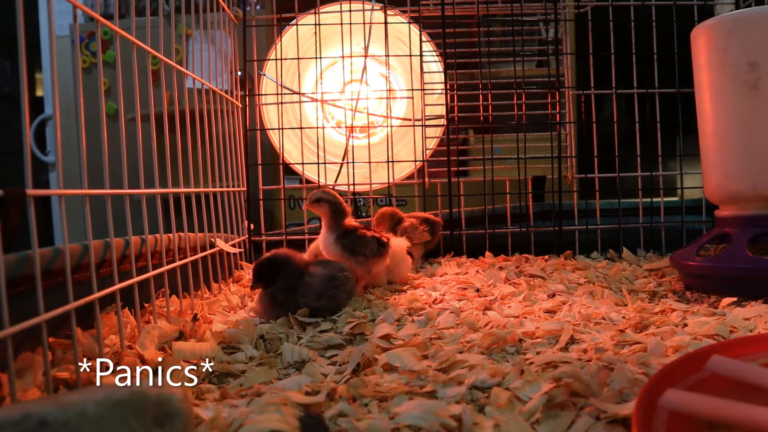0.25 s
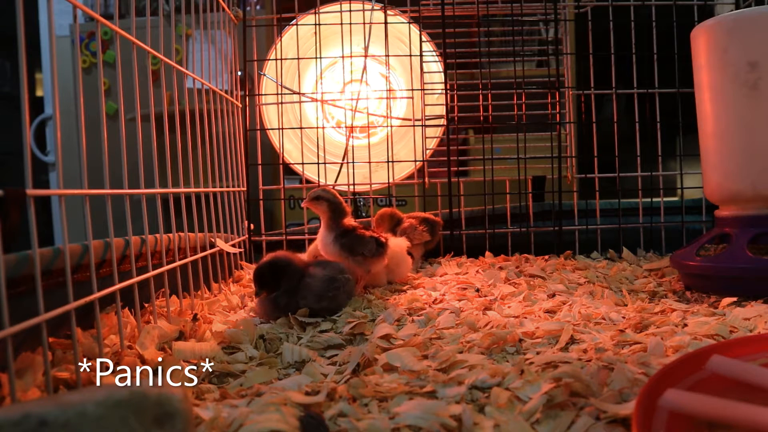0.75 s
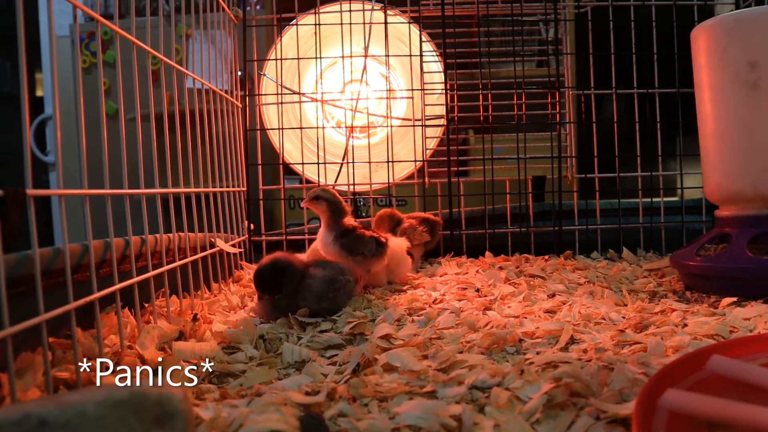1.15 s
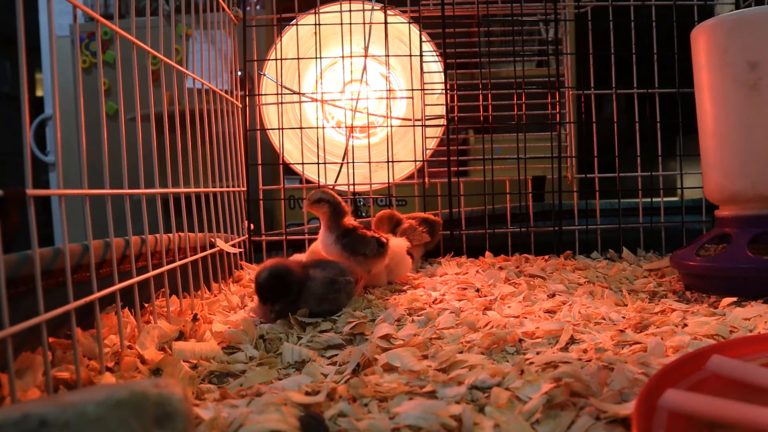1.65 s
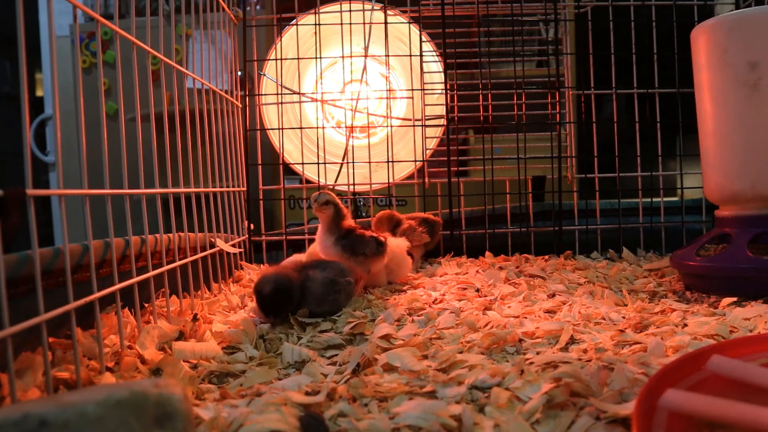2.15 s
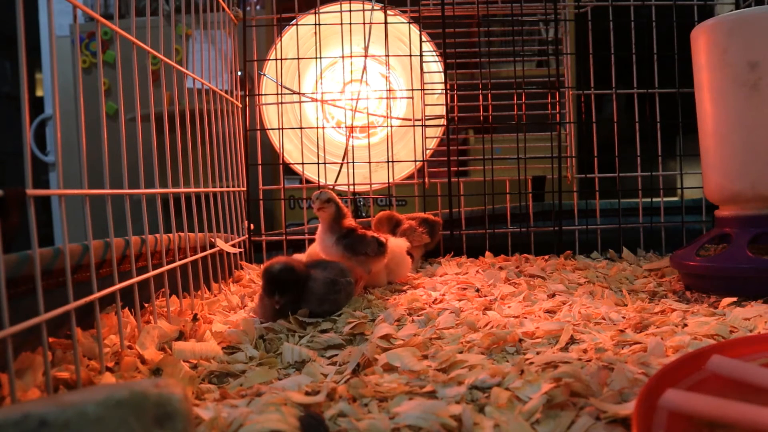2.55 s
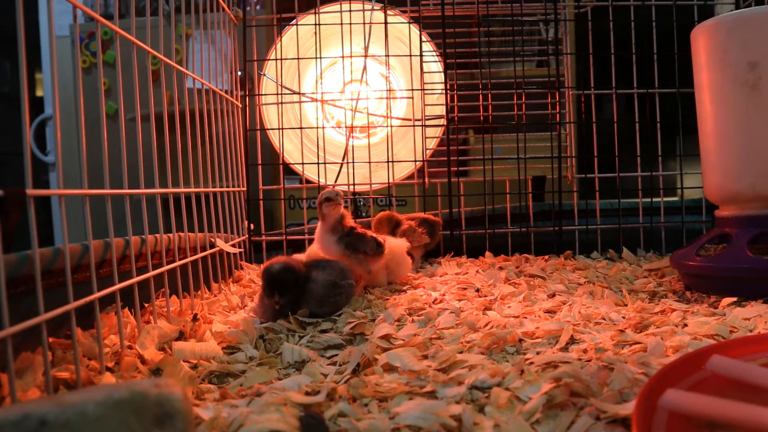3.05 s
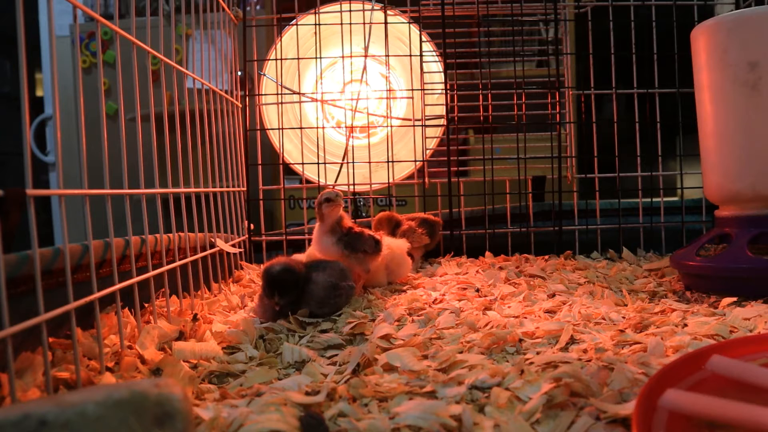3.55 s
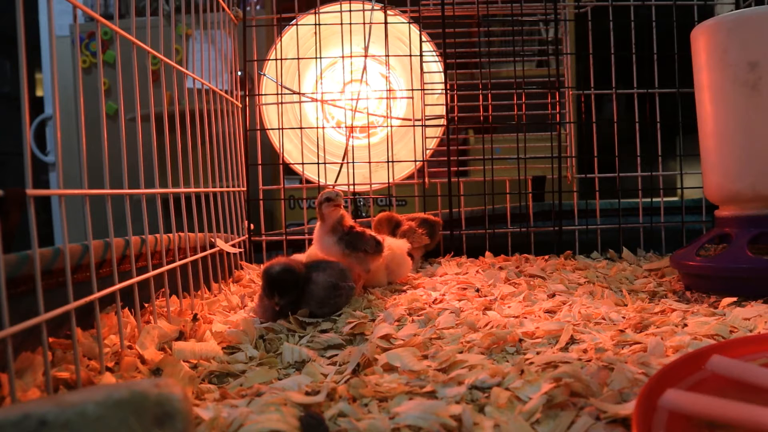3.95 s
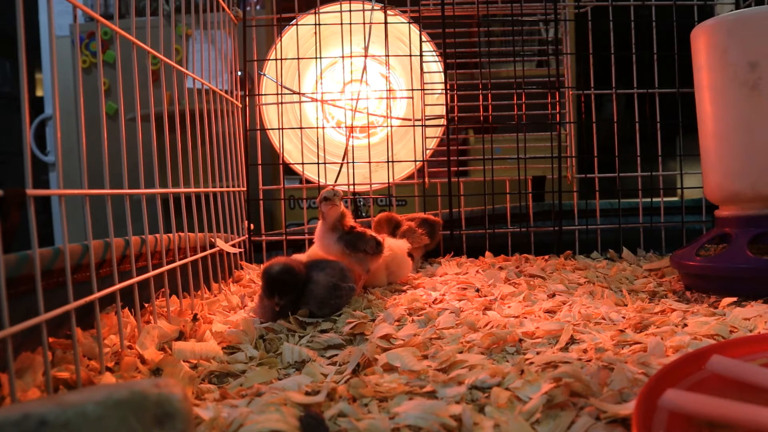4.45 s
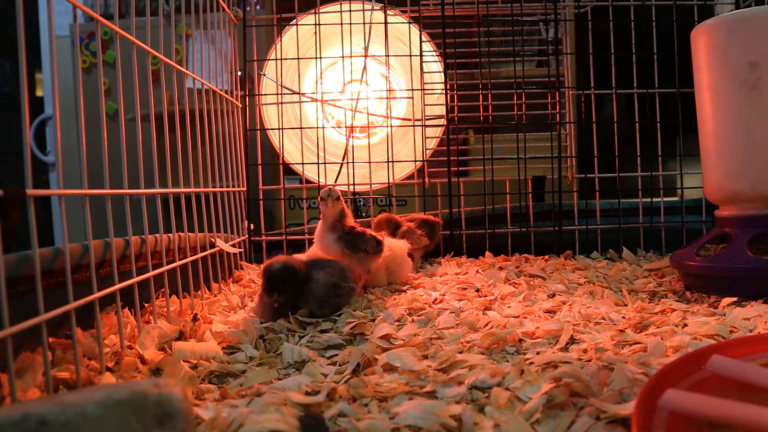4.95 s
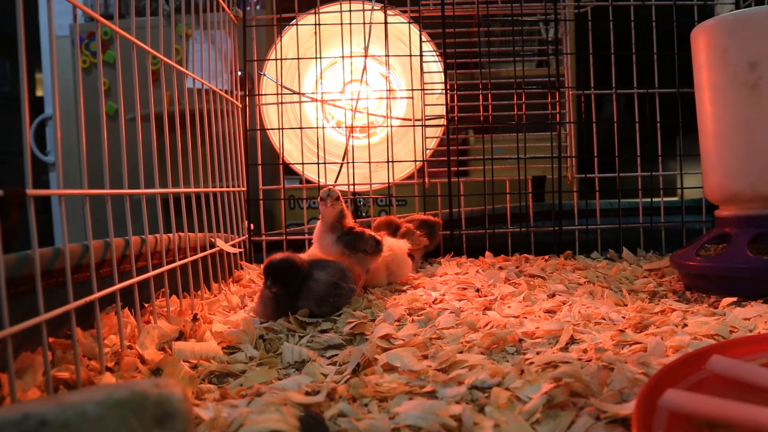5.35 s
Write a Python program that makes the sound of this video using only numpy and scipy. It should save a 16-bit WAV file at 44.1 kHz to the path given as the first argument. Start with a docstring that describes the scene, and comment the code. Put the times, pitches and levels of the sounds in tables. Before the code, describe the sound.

Faint low hum and moving air open the scene, then a chick starts calling: brief, piercing, falling peeps with a slightly raspy, fluttering onset and a clean whistled end. About fourteen calls follow, becoming more regular and forceful. Tiny dry ticks and two soft puffs are barely noticeable between them. Close stereo pickup in a small room, with short reflections off the cage and walls.

```python
"""Chick peeping in a brooder

A chick gives loud distress peeps in a wire brooder in a small room. Two beating syrinx voices slide down and
lock into one whistle, which plunges as the breath runs out; throat and beak colour it, and near surfaces
notch it as it falls. The chick turns its head to the microphones and calls with growing effort.
Behind it: hum of wavering sines, moving air and a hollow tone of shaped noise, ticks in the shavings,
soft puffs of noise."""
import sys
import numpy as np
from scipy import signal
from scipy.fft import rfft, irfft, next_fast_len
from scipy.io import wavfile
from scipy.ndimage import uniform_filter1d

SR = 44100
rng = np.random.default_rng(int(sys.argv[2]) if len(sys.argv) > 2 else 0)


def output_pcm(signal):
    """Save a mono or channel-first signal as 16-bit PCM at the path in sys.argv[1].

    Samples are clipped to [-1, 1] before scaling.
    """
    pcm = np.clip(np.atleast_2d(signal).T, -1, 1) * 32767
    wavfile.write(sys.argv[1], SR, np.round(pcm).astype(np.int16))


N = 246959
TIME = np.arange(N) / SR  # s


def from_db(db):
    """Decibels to amplitude gain."""
    return 10 ** (np.asarray(db) / 20)


def rms_one(x):
    """Scale to unit rms."""
    return x / np.sqrt(np.mean(x ** 2) + 1e-20)


def at_hz(points, hz):
    """Read a spectrum on a log-frequency axis."""
    freqs, values = np.transpose(points)
    return np.interp(np.log(np.maximum(hz, 1)), np.log(freqs), values)


def colour(x, gain_at):
    """Filter by a gain that is a function of frequency."""
    length = x.shape[-1]
    size = next_fast_len(length + SR // 2)
    hz = np.arange(size // 2 + 1) * SR / size
    return irfft(rfft(x, size) * gain_at(hz), size)[..., :length]


def drift(rate_hz):
    """Low-passed noise of unit rms: a smooth random wander."""
    noise = rng.standard_normal(N)
    return rms_one(colour(noise, lambda hz: 1 / (1 + (hz / rate_hz) ** 2)))


def bandpass(x, low_hz, high_hz):
    """Butterworth band-pass."""
    return signal.sosfilt(signal.butter(2, [low_hz, high_hz], "band", fs=SR, output="sos"), x)


def swelling(rows):
    """Sum of bell-shaped gains, one per row: centre in seconds, level in dB, half length in seconds."""
    return sum(from_db(db) * np.exp(-((TIME - s) / half_s) ** 2) for s, db, half_s in rows)


# Electric and motor tones. Each row: frequency in Hz, rms level in dB before gain.
HUM_TONES = [(59.2, -65), (118.4, -54.5), (220.7, -54.5), (323.0, -76.5), (409.1, -65.5), (473.7, -66)]
# Hum level, used relative to its mean over time. Each row: time in seconds, level in dB.
HUM_SWELL = [(0.0, -49), (0.11, -44), (1.12, -50), (3.65, -49), (4.46, -54), (4.99, -49), (5.6, -53.5)]


def hum(gain_db=-1.0, waver_db=1.5, wander_rad=0.25):
    """Low electric and motor tones: sines wavering in level and phase."""
    swell_db = np.interp(TIME, *np.transpose(HUM_SWELL))
    tones = np.zeros(N)
    for hz, db in HUM_TONES:
        level = np.sqrt(2) * from_db(db + waver_db * drift(2.3))
        tones += level * np.sin(2 * np.pi * hz * TIME + wander_rad * drift(2.2))
    return tones * from_db(gain_db + swell_db - swell_db.mean())


# Moving-air spectrum. Each row: frequency in Hz, relative density in dB per Hz.
AIR_SPECTRUM = [(15, -65.5), (25, -26), (54, -12), (86, -17), (115, -9.5), (181, -11), (219, -5.5),
                (293, -14.5), (475, -14), (604, -21), (3350, -29.5), (4260, -32.5), (10000, -42),
                (12400, -49), (15000, -73.5)]
# Moving-air level before gain. Each row: time in seconds, level in dB.
AIR_SWELL = [(0.0, -54), (0.06, -53.5), (0.5, -51), (0.67, -56), (3.49, -55.5), (5.6, -57.5)]
# Left-right likeness of the air. Each row: frequency in Hz, likeness from -1 to 1.
AIR_LIKENESS = [(60, 0.93), (160, .93), (300, 0.88), (500, -0.0084), (1000, -0.34), (2500, -0.585),
                (12000, -0.61)]


def air(gain_db=6.5):
    """Rush of air: shaped noise, alike on both sides only in the bass."""
    def spread(hz):
        alike = np.clip(at_hz(AIR_LIKENESS, hz), -1, 1)
        return from_db(at_hz(AIR_SPECTRUM, hz)) * np.sqrt([1 + alike, 1 - alike])

    mid, side = colour(rng.standard_normal((2, N)), spread)
    level_db = gain_db + np.interp(TIME, *np.transpose(AIR_SWELL))
    return rms_one(np.array([mid + side, mid - side])) * from_db(level_db)


# Swells of the hollow tone. Each row: centre in seconds, level in dB, half length in seconds.
HOLLOW_SWELLS = [(.31, -57.5, .06), (.88, -56.5, .03), (1.76, -60.5, 0.18), (2.58, -58.5, 0.076)]


def hollow(centre_hz=780, width_hz=70, rest_db=-76):
    """Faint hollow tone: a narrow band of noise that comes and goes."""
    noise = rng.standard_normal((2, N))
    band = colour(noise, lambda hz: 1 / (1 + ((hz - centre_hz) / width_hz) ** 2))
    return rms_one(band) * (from_db(rest_db) + swelling(HOLLOW_SWELLS))


# Ticks in the wood shavings. Each row: start in seconds, peak force in dB before gain.
SHAVING_TICKS = [(0.304, -48), (1.0066, -56), (2.8705, -51)]


def shavings(gain_db=-4, decay_s=0.0021):
    """Tiny dry cracks under the chick's feet: decaying bursts of treble noise."""
    force = np.zeros(N)
    for s, db in SHAVING_TICKS:
        force += from_db(db + gain_db) * (TIME >= s) * np.exp(-abs(TIME - s) / decay_s)
    return force * bandpass(rng.standard_normal(N), 6000, 12500)


def contour(t, times, values):
    """Muscle gesture: a line through landmarks, corners rounded."""
    line = np.interp(t, np.maximum.accumulate(times), values)
    return uniform_filter1d(line, size=130, mode="nearest")


SLIDE_SHARE = 0.55  # slide starts at this share of the way to the lock
CREST_RATIO = 1.162  # upper voice's crest / opening pitch
# whistle's sag as a share of its pitch, its reduction at full effort, part of it before the middle
SAG, SAG_EFFORT, SAG_EARLY = .195, 0.043, .4
SLACK_HZ, RELAX_S = 2815.2, 0.004446  # the plunge relaxes towards the slack membranes' pitch
# base level at no effort, and what full effort adds; overtones relative to the whistle
WHISTLE_DB, WHISTLE_EFFORT_DB = -8, 2
OVERTONES_DB, OVERTONES_EFFORT_DB = -31.5, 11.5
OPENING_DB = -21.5  # base of the two opening voices, relative to the whistle
BREAK_S, BREAK_DIP = .004, .93  # overtone dropout at the pitch break: half length, depth 0-1


def peep(row, tremor, upper_db=-2.0, far_side_db=-25.0, second_db=-2.5, third_db=-18.0,
         fade_db=-10.0, hiss_db=-37.5):
    """One syrinx call: two voices modulate each other, then one whistle; effort adds level and overtones."""
    start, lock, plunge, plunge_s, low_hz, mid_hz, _, effort = row
    t = np.arange(tremor.shape[1]) / SR
    low_jitter, high_jitter, waver, flutter, rattle, turbulence = tremor
    slide = SLIDE_SHARE * lock
    halfway, middle, end = (slide + lock) / 2, (lock + plunge) / 2, plunge + plunge_s
    sag_hz = (SAG - SAG_EFFORT * effort) * mid_hz
    lock_hz = mid_hz + SAG_EARLY * sag_hz
    late_hz = mid_hz - (1 - SAG_EARLY) * sag_hz

    # lower voice holds, slides, sags and plunges
    hold = contour(t, [0, slide / 2, slide], [(low_hz + 6100) / 2, 1.008 * low_hz, .98 * low_hz])
    sag_times = lock + (plunge - lock) * np.array([0, .2, .5, .8, 1])
    sag_pitches = [lock_hz, (lock_hz + mid_hz) / 2, mid_hz, .58 * mid_hz + .42 * late_hz, late_hz]
    sag = contour(t, sag_times, sag_pitches)
    relaxed = 1 - np.exp(-np.clip(t - plunge, 0, plunge_s) / RELAX_S)
    lower = sag + (hold - lock_hz) * contour(t, [slide, halfway, lock], [1, .32, 0])
    lower = lower + (SLACK_HZ - late_hz) * relaxed

    # upper voice arches down towards it
    arch = CREST_RATIO * low_hz * contour(t, [0, .25 * slide, .55 * slide, slide], [.92, .98, 1, .955])
    upper = lock_hz + (arch - lock_hz) * contour(t, [slide, halfway, lock], [1, .6, .1])

    # least steady just before the lock and in the plunge
    unsteady = contour(t, [0, slide, halfway, lock, plunge - .004, plunge + .004],
                       [.003, .007, .016, .0022, .0025, .022])
    pitches = [lower, upper] * (1 + unsteady * (waver + [low_jitter, high_jitter]))
    low_side, high_side = np.exp(2j * np.pi * np.cumsum(pitches, axis=1) / SR)

    # coupling adds difference tones on both sides of the pair
    apart = contour(t, [halfway, lock - .002], [1, 0])
    beat = high_side / low_side
    partners = from_db(upper_db) * beat + from_db(far_side_db) * (beat ** 2 + beat ** -2)
    sidebands = (partners + .32 / beat) * (1 + .3 * rattle)
    wave = low_side * (1 + np.sqrt(abs(apart)) * sidebands)

    # overtones flutter with the membranes and drop out as the pitch breaks
    rasp_db = contour(t, [0, slide / 2, slide, halfway, lock - .008, lock, middle, plunge, end],
                      [13, 14, 21, 17.36, 13, 8.8, 17, 5.7, 13])
    unbroken = 1 - BREAK_DIP * np.exp(-((t - plunge) / BREAK_S) ** 4)
    rasp = unbroken * from_db(OVERTONES_DB + OVERTONES_EFFORT_DB * effort + rasp_db)
    second = from_db(second_db) * (1 + 0.33 * flutter) * wave ** 2 / np.sqrt(abs(wave) + 0.12)
    third = from_db(third_db) * flutter * low_side ** 3
    wave = wave + rasp * (second + third)

    breath_db = contour(t, [0, halfway, lock - .004, lock + .004], [10, 19.5, 12, -0.5])
    hiss = from_db(hiss_db + breath_db) * turbulence
    pressure_db = contour(
        t, [0, 0.46 * slide, slide, halfway, lock - .005, lock, middle, plunge, plunge + plunge_s / 2, end],
        [OPENING_DB - 9, OPENING_DB - 2.0, OPENING_DB + 5.0, -10, -6, 2, 2.5, -1, -9.5, fade_db])
    gate = contour(t, [0, .004, end, end + .005], [0, 1, 1, 0])
    level = from_db(WHISTLE_DB + WHISTLE_EFFORT_DB * effort + pressure_db)
    return (wave.real + hiss) * level * gate


# Beak-to-microphone paths, head facing. Each row: frequency in Hz, left level in dB, right level in dB,
# left phase lead in rad.
FACING_PATHS = [(3053, 6.5, 2, 2.2479), (3710, -1.5, -15, 1.02), (4095, -2, -7, -0.95),
                (3880, -0.5, 3, -1.98), (4312.5, 0, 1.5, -0.6361), (4402.3, -8, 1, -3),
                (4518.7, 0, 3.5, -6.5), (4687, 2, 1.5, -4.5), (5270, 2.5, 1, -6), (5313, -1.5, -2, -4.5),
                (6410, 3, -2, -5.5), (9142, 0, -2, -7), (10650, 0, 3.5, -9.5), (12900, -1.5, -4.5, -10.5)]
# The same, head turned aside. Each row: frequency in Hz, left level in dB, right level in dB,
# left phase lead in rad.
ASIDE_PATHS = [(3120, 0.5, -1, 2), (3690, 9, -10, -3.5), (4050, 6, -7.5, -3), (4160, 3.5, 2, -2.11),
               (4420, 2.5, 1, -1), (4462, 6, 1, -1.4637), (4634, 0, 4, -3), (4850, -3.5, 2, -7.5),
               (5130, -2, -3.5, -4.5), (5550, -1.5, -3, -4.5), (6300, 4, -2.5, -4.5), (9200, -4.5, 7, -9),
               (11800, -2, 2.5, -10.5), (13000, -9.5, -9.5, -11.5)]
# cancelled pitch at left and right microphone with head facing, and its rise with head aside
NOTCH_LEFT_HZ, NOTCH_RIGHT_HZ, NOTCH_TURN_HZ = 4704.8, 4696.5, 170
NOTCH_WIDTH_HZ, NOTCH_DEPTH = 55, 0.985


def brooder(x, turned):
    """Direct sound and near reflections interfere at each microphone, in a pattern that follows the head."""
    def read(pose, hz):
        freqs, *columns = np.transpose(pose)
        return np.array([np.interp(hz, freqs, column) for column in columns])

    def paths(hz):
        left_db, right_db, lead_rad = (1 - turned) * read(FACING_PATHS, hz) + turned * read(ASIDE_PATHS, hz)
        cancelled_hz = np.array([[NOTCH_LEFT_HZ], [NOTCH_RIGHT_HZ]]) + NOTCH_TURN_HZ * turned
        notch = 1 - NOTCH_DEPTH / (1 + 1j * (hz - cancelled_hz) / NOTCH_WIDTH_HZ)
        return notch * np.array([from_db(left_db) * np.exp(1j * lead_rad), from_db(right_db)])

    return colour(x, paths)


# Peeps. Each row: start in seconds, voices' lock in seconds after start, plunge in seconds after start,
# plunge length in seconds, nominal opening pitch in Hz, whistle pitch in Hz, head turned aside 0-1, effort 0-1.
PEEP_CALLS = [(0.478, 0.0482, 0.1196, 0.00089, 5574, 4466, 0.96, .1),
              (0.82, 0.07076, 0.1206, 0.00059, 5901, 4398, 0.98, 0.09),
              (1.444, 0.0567, 0.112, 0.0017, 5561, 4408, 0.95, 0.09),
              (1.851, 0.0623, 0.12424, 0.00071, 5880, 4418, 0.31, 0.22),
              (2.172, 0.0719, 0.1281, 0.0083, 6019, 4507, .15, .5),
              (2.511, 0.07506, 0.1206, 0.0098, 6029, 4526, 0.05, 0.49),
              (2.916, 0.07704, 0.127, 0.001045, 5992, 4502, 0.22, 0.43),
              (3.265, 0.0824, 0.1269, .004, 6026, 4521, 0.09, .55),
              (3.597, 0.0842, 0.12946, 0.00662, 6186, 4595, 0, 0.83),
              (3.920, 0.0831, 0.12045, 0.01416, 6247, 4645, 0, 0.87),
              (4.263, 0.08074, 0.1267, 0.0103, 6182, 4597, 0.09, 0.74),
              (4.605, 0.08045, 0.11894, 0.0118, 6078, 4547, 0.1, 0.7),
              (5.051, 0.0764, 0.1268, 0.0156, 6170, 4574, 0.07, 1),
              (5.383, 0.0719, 0.12926, 0.0127, 6298, 4664, 0.2, 0.93)]
# Throat and open beak. Each row: frequency in Hz, gain in dB.
THROAT_GAIN = [(2400, -35), (2900, -9.5), (3500, -8), (4100, -2.5), (4550, -1.5), (4850, -4), (5300, -3),
               (6100, -2.5), (7100, -10), (7500, -11.5), (8200, -13), (9200, -17), (10200, -10.5),
               (12000, -1), (13500, -17.5), (15000, -21.5)]


def chick():
    """Peeps filtered by throat and beak: mono voice, and its direct sound at the two microphones."""
    voice, direct = np.zeros(N), np.zeros((2, N))
    # low jitter, high jitter, waver, flutter, rattle, turbulence
    tremor = np.array([drift(rate_hz) for rate_hz in (300, 300, 70, 300, 500, 8000)])
    for row in PEEP_CALLS:
        start, _, plunge, *_, turned, _ = row
        span = slice(round(start * SR), round((start + plunge + .06) * SR))
        call = colour(peep(row, tremor[:, span]), lambda hz: from_db(at_hz(THROAT_GAIN, hz)))
        voice[span] += call
        direct[:, span] += brooder(call, np.clip(turned, 0, 1))
    return voice, direct


ROOM_T60_S, ROOM_DB = 0.249, -15.5


def room(x, early_db=9.0, early_s=0.06):
    """Diffuse echoes as decaying noise: dense early scatter off the cage, then the room's short tail."""
    t = np.arange(SR // 2) / SR
    arrival = np.clip((t - .004) / .005, 0, 1)
    early = 1 + from_db(early_db) * np.exp(-t / early_s)
    decay = from_db(-60 * t / ROOM_T60_S) * early * arrival
    echoes = rng.standard_normal((2, len(t))) * decay / np.sqrt(np.sum(decay ** 2))
    return from_db(ROOM_DB) * signal.fftconvolve(x[None], echoes, axes=1)[:, :N]


# Soft noise puffs. Each row: centre in seconds, level in dB, half length in seconds.
NOISE_PUFFS = [(2.23, -54.5, 0.03), (2.996, -51.5, 0.027)]


def puffs(low_hz=450, high_hz=2200):
    """Soft puffs of band-passed noise, swelling and fading."""
    band = bandpass(rng.standard_normal((2, N)), low_hz, high_hz)
    return swelling(NOISE_PUFFS) * rms_one(band)


def scene(chick_db=0.0):
    """The chick in its brooder over the room's background."""
    voice, direct = chick()
    calls = from_db(chick_db) * (direct + room(voice))
    return calls + shavings() + puffs() + hum() + air() + hollow()


CUTOFF_HZ = 15400


def record(dry):
    """Steep elliptic low-pass."""
    return signal.sosfilt(signal.ellip(10, .1, 80, CUTOFF_HZ, fs=SR, output="sos"), dry)


dry = scene()
out = record(dry)
output_pcm(out)
```